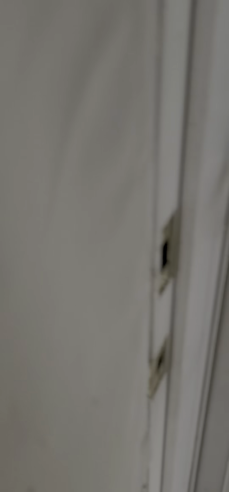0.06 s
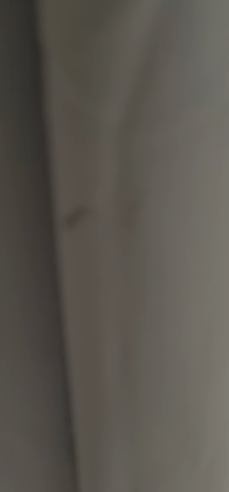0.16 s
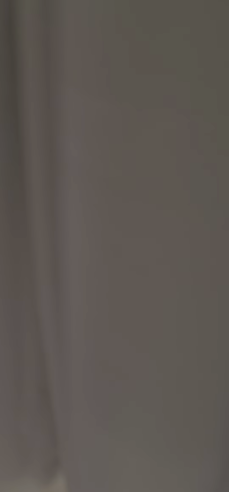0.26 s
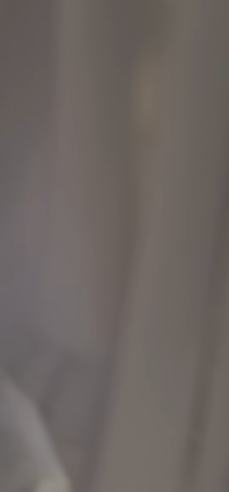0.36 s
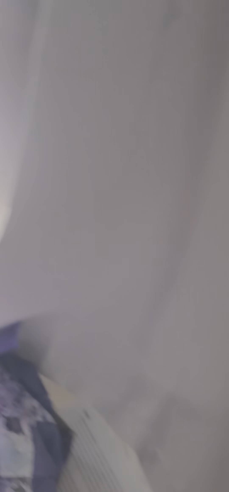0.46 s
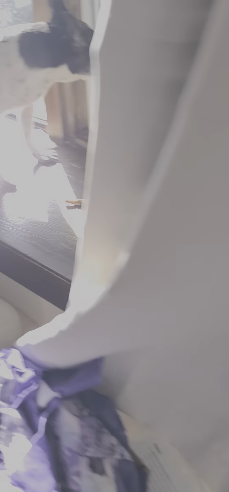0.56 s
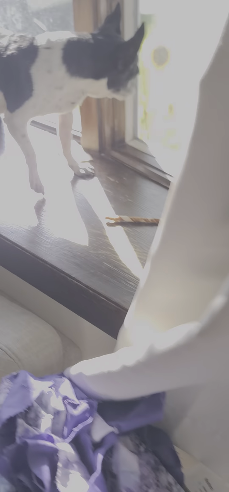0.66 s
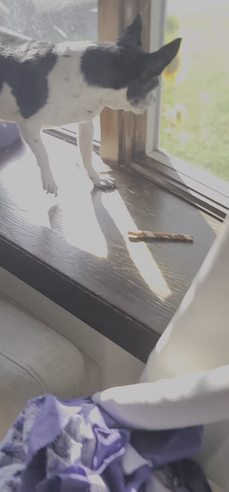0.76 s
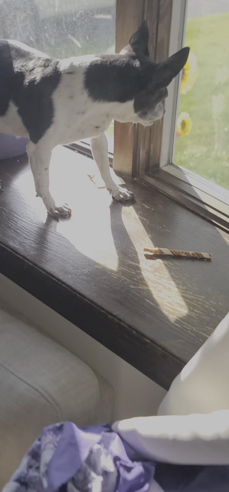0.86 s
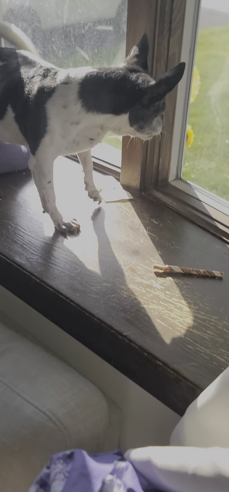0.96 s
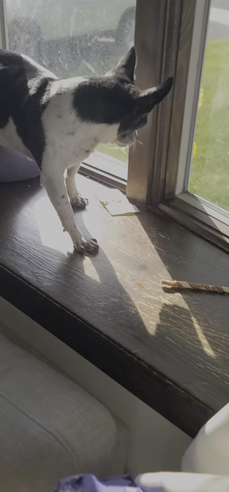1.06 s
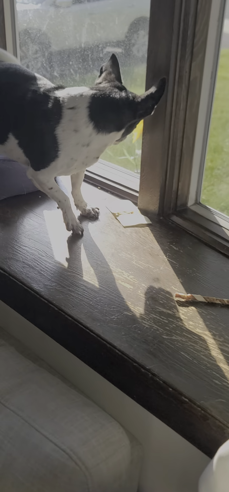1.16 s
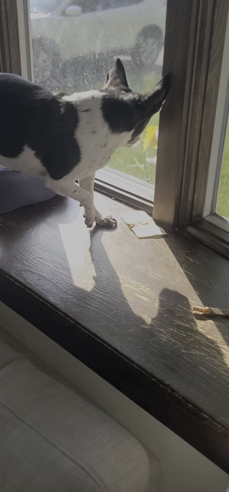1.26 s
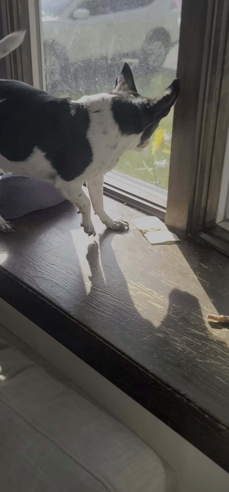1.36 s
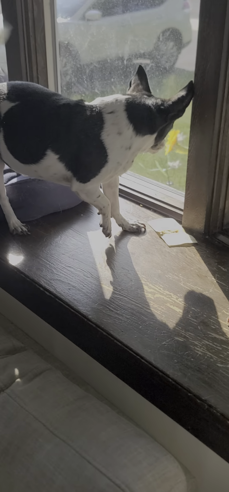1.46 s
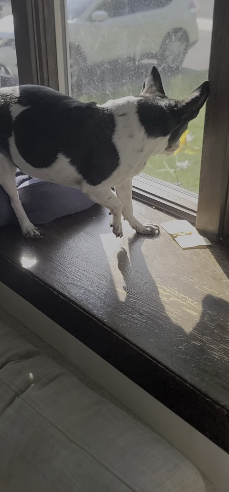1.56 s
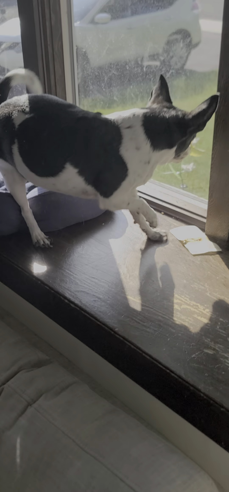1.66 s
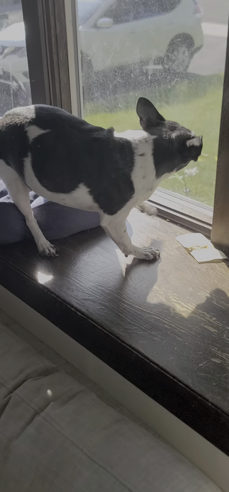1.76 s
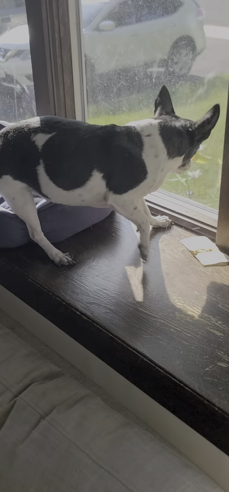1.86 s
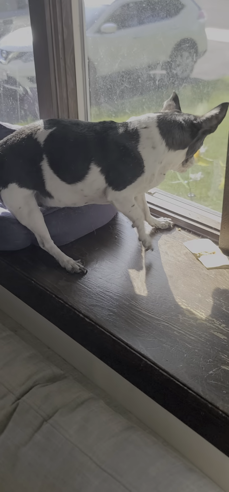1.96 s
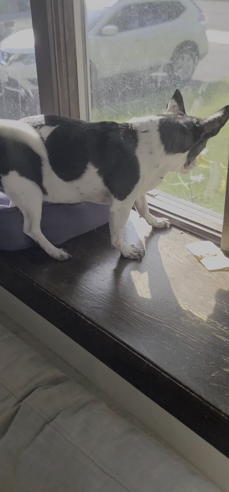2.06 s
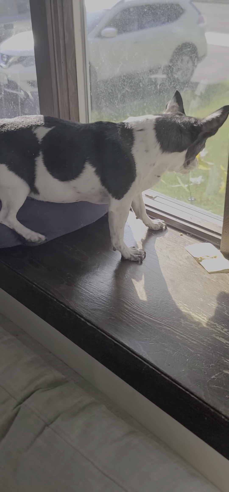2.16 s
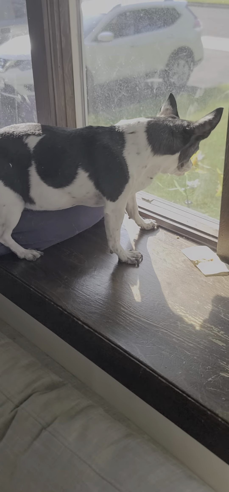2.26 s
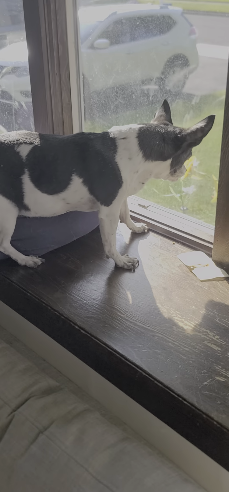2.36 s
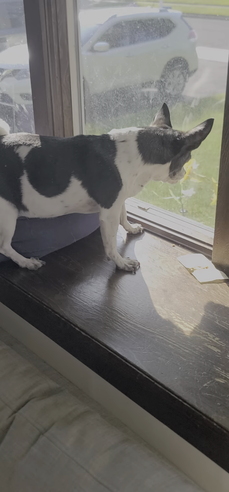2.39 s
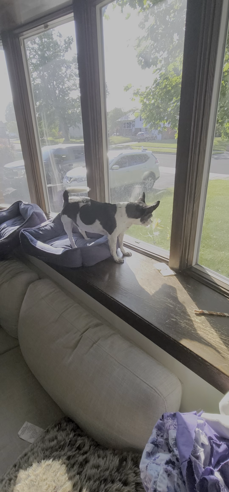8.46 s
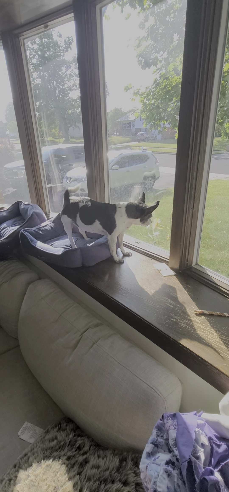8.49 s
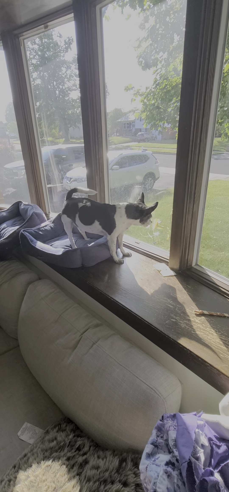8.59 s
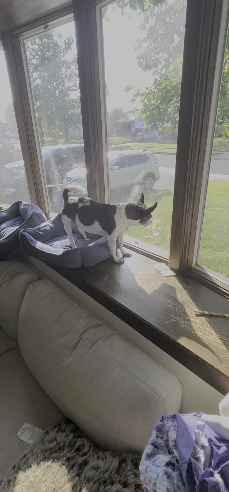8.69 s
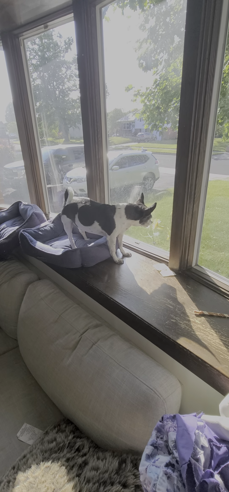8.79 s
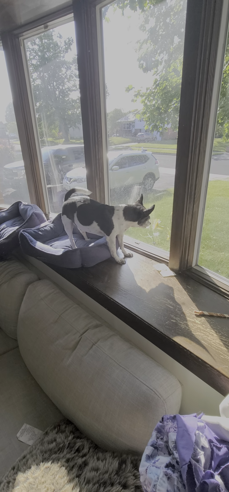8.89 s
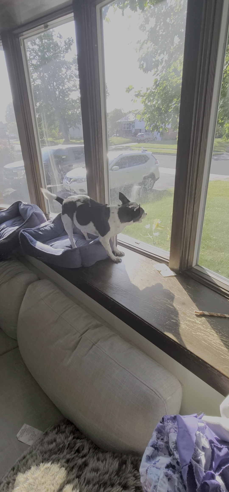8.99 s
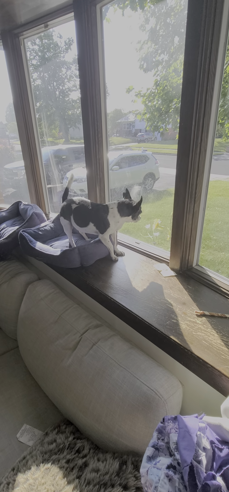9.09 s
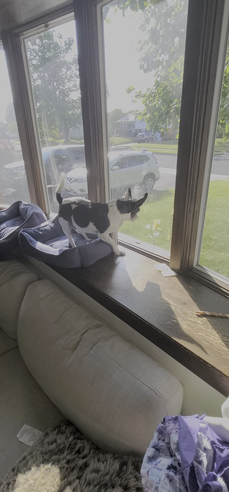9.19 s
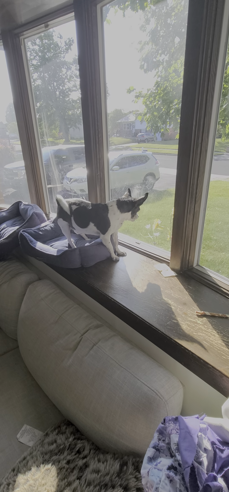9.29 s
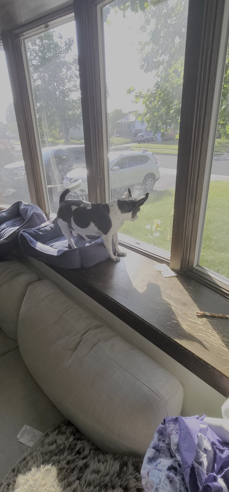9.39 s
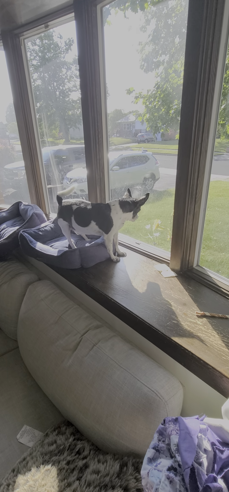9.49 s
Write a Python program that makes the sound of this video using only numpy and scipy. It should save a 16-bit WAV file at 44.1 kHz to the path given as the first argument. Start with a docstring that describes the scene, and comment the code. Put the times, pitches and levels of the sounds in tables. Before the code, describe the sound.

A small dog on a living-room window sill throbs out low growls, each snapping into one sharp, high yap, eight times over.

```python
"""A small dog growls and barks eight times at something outside, on a window sill in a living room.
Each growl throbs about 24 times a second and leads into one arched yap with low grunts behind it;
these voices are vocal-fold pulses and puffs of air, filtered by throat and mouth resonances.
Wet mouth clicks and soft sniffs are shaped noise, a smooth moan is the growl's voice without throbs.
Dull low bumps are sine swells; filtered noise makes the quiet room, and sparse echoes answer the dog."""
import sys
import numpy as np
from scipy import signal
from scipy.fft import rfft, irfft, next_fast_len
from scipy.io import wavfile
from scipy.ndimage import uniform_filter1d, map_coordinates

SR = 44100
rng = np.random.default_rng(int(sys.argv[2]) if len(sys.argv) > 2 else 0)


def persist_wave(psi):
    """Save psi, clipped to +-1, as 16-bit WAV."""
    counts = np.round(np.clip(psi, -1, 1) * 32767).astype(np.int16)
    wavfile.write(sys.argv[1], SR, np.atleast_2d(counts).T)


N = 420713

# Yaps: (onset [s], length at full voice [s], effort [dB], top pitch [Hz], place of the top [share of length],
#        then relative to effort: chest under 600 Hz [dB], open-mouth resonance [dB],
#        upper throat resonance [dB], hiss [dB])
YAPS = [(0.459, 0.11, -7, 385.4, 0.7245, 3.5, -9.5, -18, -22),
        (1.708, 0.078, -7, 383, 0.58, 4.5, -6.5, -21.5, -20),
        (2.595, 0.089, -9, 387.2, 0.59, 2.5, -2.5, -18, -20),
        (3.702, 0.091, -10.5, 387.9, 0.58, 1.5, -2, -18, -19),
        (5.137, 0.12, -10, 396.5, 0.8, 1.5, -4, -21, -22.5),
        (6.363, 0.103, -10.5, 380.1, 0.45, 2.5, -2.5, -17, -21),
        (7.685, 0.098, -9.5, 394.3, 0.6, -0.5, -2, -18, -23.5),
        (8.947, 0.086, -10.5, 387.3, 0.6, 2, -1.5, -15.5, -20.5)]
# Growls: (first throb [s], length [s], first throb period [s], start effort [dB], end effort [dB],
#          start pitch [Hz], end pitch [Hz], jaw gap as gain of the throat above 600 Hz [dB])
GROWLS = [(0.25, 0.18, 0.0355, -35, -24.5, 190, 188.3, -14.5),
          (1.408, 0.27, 0.038, -31, -32, 195.9, 207, -10.5),
          (2.471, 0.099, 0.034, -31.5, -32.5, 221, 250.2, -0.5),
          (3.325, 0.32, 0.0391, -38.5, -23, 189.1, 236.5, 3),
          (4.381, 0.715, 0.0393, -27, -26, 238.3, 241.1, 3),
          (5.9, 0.415, 0.0405, -37, -26.5, 188.5, 231.5, -1.5),
          (7.162, 0.53, 0.0402, -37, -25.5, 176, 238.4, 2.5),
          (8.461, 0.5, 0.0404, -39, -24.5, 171, 239.7, 3.5)]
# Grunts as the throat closes after a bark: (time [s], relative level [dB], nominal pitch [Hz])
GRUNTS = [(0.602, -21, 129), (0.639, -23, 124.5), (0.743, -25, 197.2), (1.911, -26.5, 98.6),
          (1.966, -23.5, 140.8), (2.004, -32.5, 140), (2.738, -27.5, 208.3), (2.879, -27, 145.9),
          (3.955, -27, 166.4), (4.019, -27, 141.8), (5.395, -25.5, 149.2), (6.518, -27, 136.7),
          (6.691, -31, 136), (7.955, -25.5, 166.7), (7.999, -30, 163), (9.188, -23, 154.1)]
# Clicks of lips and tongue: (time [s], relative level [dB], bite under 4.7 kHz [dB], sparkle over 8 kHz [dB])
MOUTH_CLICKS = [(0.0313, -29, -1, -17.5), (0.322, -26, -5, -14.5), (1.028, -17, -6, -3),
                (1.1428, -33.5, 0, -21), (1.4188, -39, -11, -7), (1.8281, -27, -5.5, -18),
                (1.885, -34, -3.5, -7.5), (1.9998, -33, 1, -12), (2.2252, -32, -0.5, -12.5),
                (3.9694, -40.5, -4, -5), (4.261, -45, -5, -13), (4.4724, -33, 0, -6),
                (4.904, -31, 1.5, -16.5), (5.378, -34, -3.5, -8), (5.794, -32, -5.5, -11.5),
                (6.0684, -40, 0, -13), (6.6426, -46.5, 2, -10), (6.9944, -39, -6, -9.5),
                (7.9762, -45, -2.5, -11.5), (8.4998, -50, 5.5, -10.5), (9.2877, -41.5, 1, -13)]
# Dull bumps: (time of the height [s], relative level [dB])
BUMPS = [(4.805, -35), (5.095, -36), (5.134, -35), (8.275, -36.5), (8.344, -47.5)]
# Soft sniffs: (time [s], level [dB], length [s])
SNIFFS = [(0.018, -67.5, 0.13), (0.387, -46, 0.062), (0.88, -56.5, 0.18), (1.038, -51, 0.0683),
          (1.146, -46, 0.076), (1.33, -64, 0.145), (2.059, -53.5, 0.061), (2.263, -66.5, 0.05),
          (2.363, -55.5, 0.096), (4.094, -53.5, 0.0935), (4.739, -57, 0.085), (5.055, -45.5, 0.048)]
# One moan that sinks into the second growl: (time [s], effort [dB], pitch [Hz], roughness [0-1],
#          then relative to effort: open-mouth resonance [dB], rasp [dB])
MOAN = [(1.145, -35.5, 234, 0.3, -16, -12.5), (1.18, -31, 252.6, 0.5, -4, -31.5),
        (1.25, -30, 259.4, 0.2, -20, -31), (1.33, -31.5, 240.1, 0.2, -26, -33.5),
        (1.4, -36.5, 203, 0.6, -23, -32.5)]

# Throat resonances of the yap: (frequency [Hz], level [dB])
YAP_THROAT = [(60, -42.5), (180, -18), (280, -13.5), (380, -12), (480, -8.5), (620, 0.5), (760, -1.5),
              (900, -3), (1020, -12), (1170, -4), (1400, -16.5), (1600, -22)]
# Upper throat resonance of the yap: (frequency [Hz], level [dB])
YAP_UPPER = [(1200, -38), (1650, -8.5), (1950, 2), (2330, 0.5), (2700, -17.5), (3200, -17.5), (3800, -26.5),
             (5000, -53.5)]
# Breathy hiss of the yap: (frequency [Hz], level [dB])
YAP_HISS = [(2000, -40), (3200, -14.5), (3750, -22), (4300, -8), (4800, -18), (5500, -2.5), (6700, -1.5),
            (7900, -7), (9300, -9.5), (11000, -9.5), (14000, -11.5), (16000, -11)]
# Throat resonances of the growl: (frequency [Hz], level [dB])
GROWL_THROAT = [(60, -40.5), (150, -13.5), (225, -5.5), (330, -7), (450, -12.5), (560, -3.5), (700, -1),
                (830, -9), (1000, -19), (1200, -28.5), (1600, -40)]
# Raspy puffs of the growl: (frequency [Hz], level [dB])
GROWL_RASP = [(1000, -34.5), (1800, -1.5), (2800, 2.5), (4300, -18), (5600, -8.5), (7000, -11), (8700, -9),
              (11000, -9.5), (16000, -33.5)]
# Air between the teeth in a growl: (frequency [Hz], level [dB])
GROWL_AIR = [(4000, -28.5), (5800, -14), (7600, -12.5), (8500, 3), (9200, 2), (10000, -14), (16000, -22)]
# Wet crackle of the clicks: (frequency [Hz], level [dB])
CLICK_COLOUR = [(100, -6.5), (600, -9.5), (1500, -7), (2400, -2.5), (3300, 3.5), (4500, -17.5), (6300, -7),
                (9000, -15), (15000, -14.5)]
# Air through the nose: (frequency [Hz], level [dB])
SNIFF_COLOUR = [(300, -20), (1200, -8), (2000, -1.5), (3000, 5.5), (4500, -7.5), (6300, -4.5),
                (9000, -15.5), (15000, -17.5)]
# Room tone: (frequency [Hz], level [dB])
ROOM_TONE_COLOUR = [(25, -17), (60, 4.5), (130, -3), (300, -12), (650, -20.5), (1100, -28), (2100, -31),
                    (4000, -38.5), (7000, -47), (16000, -59.5)]
# Ring time of the room: (frequency [Hz], time to fall by 60 dB [s])
ROOM_T60 = [(120, 0.66), (400, 0.555), (760, 0.53), (1200, 0.47), (2200, 0.53), (3300, 0.67), (7000, 0.556),
            (15000, 0.4)]
# Strength of the room's ring: (frequency [Hz], level [dB])
ROOM_COLOUR = [(100, -6), (380, 3), (760, -5), (1200, 1.5), (2500, -8), (6500, -5), (14000, -7)]
# Lead of the left microphone in the direct sound: (frequency [Hz], phase [rad])
LEFT_LEAD = [(100, -0.75), (380, 1.19), (740, 0.5), (900, 2.5), (1080, 5), (1180, 5.5), (1500, 4),
             (2000, 7.5), (2700, 8), (7000, 15), (16000, 27)]
# Balance of the direct sound: (frequency [Hz], left minus right [dB])
LEFT_BALANCE = [(100, 2), (240, -3), (380, 5), (620, 0), (770, -8), (1000, 5.5), (1200, -3), (2000, 0.5),
                (3200, 6), (6000, 7), (9000, 3.5), (14000, 9)]

# Room tone's base level, and the upper edge of the final band
ROOM_TONE_DB, EDGE_HZ = -52, 16100

# Yap roughness (0-1): hoarse until the voice catches, clean, hoarse again as it breaks
CLEAN, HOARSE, CATCH_S, BREAK_S = 0.095, 0.62, 0.014, 0.029
# Yap effort: wells up out of the growl, jumps as the voice catches, sags while held, then drops
LEAD_IN_S, ATTACK_S, ATTACK_DB, JUMP_DB, JUMP_S = 0.05, 0.074, 38, 1.5, 0.0027
SAG_DB, RELEASE_S, RELEASE_DB_PER_S = 8, 0.046, 189.5
# Yap pitch arch: slack pitch; reach of the rise before the onset and width of the fall (shares of length)
SLACK_HZ, ARCH_RISE, ARCH_FALL = 195.9, 0.42, 0.3
# Jaws: opening times of mouth and upper resonance; loss of both and of the hiss while shut
OPEN_S, UPPER_OPEN_S, SHUT_MOUTH_DB, SHUT_UPPER_DB, SHUT_HISS_DB = 0.022, 0.075, -23, -24, -8.5
# Snarl: pitch at the onset, climb, width of each of its two filters
SNARL_HZ, SNARL_HZ_PER_S, SNARL_WIDTH_HZ = 2540, 5200, 360
# Snarl: level re effort, time of its peak, spread around the peak
SNARL_DB, SNARL_PEAK_S, SNARL_S = -25, 0.012, 0.052
# Thinning of the fundamental: depth, then place and width as shares of the yap's length
THIN_DB, THIN_AT, THIN_WIDTH = -10, 0.59, 0.17

# Throbs: width, lengthening of the period per throb, unevenness in time and strength
THROB_S, THROB_SLOWING_S, THROB_JITTER_S, THROB_SPREAD_DB = 0.0067, 0.00042, 0.001, 1.5
# Growl between throbs (re throb) at its start and end; a power under 1 makes the swell come early
TROUGH_START_DB, TROUGH_END_DB, SWELL_POWER = -14, -9, 0.7
# Lips close early in a growl: time, then mouth resonance and rasp re effort, parted and closed
LIPS_CLOSE_S = 0.092
PARTED_MOUTH_DB, CLOSED_MOUTH_DB, PARTED_RASP_DB, CLOSED_RASP_DB = -8.5, -24, -23.5, -40
# Roughness between throbs (0-1), with lips closed and parted
GROWL_ROUGH, PARTED_ROUGH = 0.52, 0.8
# A growl eases in: how much weaker it starts, and for how long
EASE_DB, EASE_S = -2, 0.019
MOAN_JAW_DB, GRUNT_S, CLICK_DECAY_S = -6.5, 0.039, 0.005


def amp(db):
    """Turns decibels into a gain."""
    return 10 ** (np.asarray(db) / 20)


def ramp(x):
    """Rises from 0 to 1 and stays there."""
    return np.clip(x, 0, 1)


def evened(x):
    """Scales a sound to an overall power of 1."""
    return x / np.sqrt(np.mean(x ** 2) + 1e-20)


def steadied(x, size=530):
    """Holds the running power of x at 1."""
    power = uniform_filter1d(uniform_filter1d(x ** 2, size), size)
    return x / np.sqrt(abs(power) + 1e-20)


def faded(x, count=260):
    """Softens both ends of a call."""
    i = np.arange(len(x))
    return x * np.minimum(np.minimum(i, i[::-1]) / count, 1)


def wobble(count, hz):
    """Random motion of unit size, low-passed at hz."""
    return evened(band(rng.standard_normal(count), hz, "low", order=2))


def read(points, hz):
    """A spectrum joined by straight lines on a log-frequency axis."""
    f, value = np.transpose(points)
    return np.interp(np.log(hz + 1), np.log(f + 1), value)


def band(x, hz, kind, order=4):
    """Butterworth filter that keeps one part of the spectrum."""
    return signal.sosfilt(signal.butter(order, hz, kind, fs=SR, output="sos"), x)


def colour(x, points, size=4096):
    """Causal minimum-phase filter with the given spectrum."""
    hz = abs(np.fft.fftfreq(size, 1 / SR))
    log_gain = np.log(amp(read(points, hz)))
    taps = np.fft.ifft(np.exp(np.conj(signal.hilbert(log_gain)))).real
    return signal.fftconvolve(x, taps[:size // 2])[:len(x)]


def rippled(spectrum, ripple_db):
    """Teeth and lips lie differently each time and lay new narrow resonances over a spectrum."""
    hz = np.geomspace(100, 16000, 120)
    ripple = ripple_db * np.clip(rng.standard_normal(len(hz)), -2, 1)
    return np.transpose([hz, read(spectrum, hz) + ripple])


def add(mix, s, sound):
    """Lays a sound into the mix at s seconds."""
    part = mix[max(round(s * SR), 0):][:len(sound)]
    part += sound[:len(part)]


def played(source, table):
    """All events of one table on one track."""
    track = np.zeros(N)
    for row in table:
        add(track, *source(*row))
    return track


def controls(rows):
    """Times and the smoothly joined columns of one call."""
    s, *columns = np.transpose(rows)
    t = np.arange(s[0], s[-1], 1 / SR)
    return t, [uniform_filter1d(np.interp(t, s, c), size=200) for c in columns]


def room_tone(swell_db=6.0, side_db=-14, hiss_db=-7):
    """Low hum of the house, slowly swelling and nearly alike in both channels, under a faint wide hiss."""
    common, apart = (evened(colour(rng.standard_normal(N), ROOM_TONE_COLOUR)) for _ in range(2))
    hum = band(common, 200, "low", order=2) * amp(swell_db * wobble(N, 1.6))
    mid = hum + band(common, 200, "high", order=2)
    side = amp(side_db) * apart + amp(hiss_db) * band(apart, 600, "high", order=2)
    return amp(ROOM_TONE_DB) * np.array([mid + side, mid - side])


def room(x, early=1.3, early_s=0.016):
    """Sparse echoes: strong early ones from the window bay, then a tail that dies by band."""
    # one echo of random sign in every slot of 20 samples, drawn apart for each channel
    slots = np.arange(130, SR - 20, 20)
    at = slots + rng.integers(0, 20, (2, len(slots)))
    taps = np.zeros((2, SR))
    np.put_along_axis(taps, at, rng.choice([-1., 1.], at.shape), 1)
    hz, t, z = signal.stft(taps, SR, nperseg=256)
    decay = amp(-60 * t / read(ROOM_T60, hz)[:, None]) * (1 + early * np.exp(-t / early_s))
    # equal echo strength in every band before the room's colour
    strength = np.sqrt(np.mean(decay ** 2, axis=1, keepdims=True) * len(slots))
    decay *= amp(read(ROOM_COLOUR, hz))[:, None] / strength
    tail = signal.istft(z * decay, SR, nperseg=256)[1]
    return signal.fftconvolve(x[None], tail, axes=1)[:, :N]


def close_pair(x, hz=420):
    """Long waves reach both microphones alike."""
    mid, side = (x[0] + x[1]) / 2, band((x[0] - x[1]) / 2, hz, "high", order=2)
    return np.array([mid + side, mid - side])


def microphones(x):
    """The direct sound reaches the two microphones with different phase and strength."""
    size = next_fast_len(N + 4096)
    hz = np.fft.rfftfreq(size, 1 / SR)
    tilt = amp(read(LEFT_BALANCE, hz))
    lag = np.exp(-1j * read(LEFT_LEAD, hz))
    # the power of both channels together stays the same at every frequency
    ports = np.array([tilt, lag]) * np.sqrt(2 / (1 + tilt ** 2))
    return irfft(rfft(x, size) * ports, size)[:, :N]


def bump(s, db, hz=62, width=0.038):
    """A soft, deep boom: a sine that swells and fades."""
    t = np.arange(-SR // 6, SR // 6) / SR
    return s + t[0], amp(db + 6.5) * np.exp(-(t / width) ** 2) * np.sin(2 * np.pi * hz * (t + s))


def sniff(s, db, length):
    """A soft, uneven hiss of air through the dog's nose."""
    count = int(max(length, .02) * SR)
    air = colour(rng.standard_normal(count) * amp(1.3 * wobble(count, 150)), SNIFF_COLOUR)
    return s, amp(db) * evened(air * signal.windows.tukey(count, .6))


def mouth_click(s, db, bite_db, sparkle_db, gain_db=-1.5, linger_db=-24):
    """A short crackle of wet lips parting, with a faint trail."""
    t = np.arange(-SR // 50, SR // 10) / SR
    noise = rng.standard_normal(len(t)) * amp(1.2 * wobble(len(t), 650))
    crackle = colour(noise, rippled(CLICK_COLOUR, ripple_db=7.0))
    bite = amp(bite_db) * evened(band(crackle, 4700, "low"))
    middle = amp(-6) * evened(band(crackle, [4000, 8000], "band"))
    sparkle = amp(sparkle_db) * evened(band(crackle, 8000, "high"))
    fall = np.exp(-t / CLICK_DECAY_S) + amp(linger_db) * np.exp(-t / 0.068)
    shape = fall / (1 + np.exp(-(t - .0015) / .0017)) ** 2
    return s + t[0], amp(db + gain_db) * shape / shape.max() * (bite + middle + sparkle)


def folds(hz, rough, jitter, air):
    """Pulses of the vocal folds and the puffs of air that they let through; rough folds beat unevenly."""
    count = len(hz)
    turns = np.cumsum(hz * (1 + jitter * (rough + 0.048) * wobble(count, 170))) / SR
    pulses = evened(sum(np.cos(2 * np.pi * k * turns) for k in np.arange(1, 17)))
    pulses *= amp(6.1 * rough * wobble(count, 160))
    # each puff starts strong and thins until the next beat
    puffs = evened((0.11 + np.exp(-(turns % 1) / 0.39)) * rng.standard_normal(count))
    return (1 - rough) * pulses + air * rough * puffs, puffs


def mouth(drive, throat, open_db):
    """The throat's first resonance always sounds; the second comes up as the jaws open."""
    voiced = colour(drive, throat)
    first = band(voiced, 950, "low", order=8)
    second = band(voiced, [980, 1650], "band", order=5)
    return steadied(first) + amp(open_db - 1.5) * steadied(second)


def rasp(drive, spectrum, course, glide, ripple_db):
    """Air in narrow resonances that shift as the given course rises and falls."""
    ringing = colour(drive, rippled(spectrum, ripple_db))
    speed = 1 + glide * evened(course - course.mean())
    return evened(map_coordinates(ringing, [np.cumsum(speed)], order=3, mode="mirror"))


def grunt(s, db, hz, gain_db=-5):
    """A few slack beats of the folds, sinking in pitch."""
    u = np.linspace(0, 1, int(GRUNT_S * SR))
    drive, _ = folds(hz * (1.1 - 0.82 * u), 0.57, jitter=0.06, air=1.)
    throat = [(50, -11), (130, 0.5), (230, -1.5), (450, -13.5), (1400, -16.0), (3000, -50.5), (12000, -52)]
    voice = evened(colour(drive, throat))
    return s, amp(db + gain_db) * voice * np.sin(np.pi * u ** 0.28)


def low_voice(hz, rough, jaw_db, open_db, rasp_db, waver=.025):
    """The hoarse, wavering voice behind nearly shut jaws."""
    drive, puffs = folds(hz * (1 + waver * wobble(len(hz), 35)), ramp(rough), jitter=.14, air=2.49)
    throat = [(f, db + jaw_db * (f > 600)) for f, db in GROWL_THROAT]
    return mouth(drive, throat, open_db) + amp(rasp_db) * evened(colour(puffs, GROWL_RASP))


def moan(rows):
    """The growling voice held smooth, without throbs."""
    t, (effort_db, hz, rough, open_db, rasp_db) = controls(rows)
    return t[0], faded(amp(effort_db) * low_voice(hz, rough, MOAN_JAW_DB, open_db, rasp_db))


def throbs(t, period, count=24):
    """A slowing, slightly uneven train of throbs, and the pinch of the throat just before each."""
    late, strong = rng.standard_normal((count, 2)).T
    periods = period + THROB_SLOWING_S * np.arange(count)
    starts = np.cumsum(periods) - periods + THROB_JITTER_S * late
    since = t - starts[:, None]
    power = amp(THROB_SPREAD_DB * strong) ** 2 @ np.exp(-(since / THROB_S) ** 2)
    pinch = np.exp(-((since + .016) / .009) ** 2).sum(0)
    return power, pinch


def growl(s, length, period, start_db, end_db, start_hz, end_hz, jaw_db,
          pinch_db=-5, lift=0.052, air_db=-35.0):
    """A growl glides towards the bark; each throb pushes up its level and pitch and clears its tone."""
    t = np.arange(-.016, length, 1 / SR)
    swell = ramp(t / length) ** SWELL_POWER
    parted = np.exp(-np.maximum(t, 0) / LIPS_CLOSE_S)
    power, pinch = throbs(t, period)
    between = amp(TROUGH_START_DB + (TROUGH_END_DB - TROUGH_START_DB) * swell + pinch_db * pinch)
    effort = np.sqrt(between ** 2 + power)
    push = 1 - between / effort
    hz = (start_hz + (end_hz - start_hz) * swell) * (1 + lift * (push - push.mean()))
    rough = (GROWL_ROUGH + (PARTED_ROUGH - GROWL_ROUGH) * parted) * (1 - 0.32 * push)
    open_db = CLOSED_MOUTH_DB + (PARTED_MOUTH_DB - CLOSED_MOUTH_DB) * parted
    rasp_db = CLOSED_RASP_DB + (PARTED_RASP_DB - CLOSED_RASP_DB) * parted
    # a thin stream of air swells and whistles between the teeth, most in long growls
    whistle = rasp(rng.standard_normal(len(t)), GROWL_AIR, -t, glide=0.017, ripple_db=6.5)
    air = amp(air_db) * length * swell * whistle
    voice = effort * low_voice(hz, rough, jaw_db, open_db, rasp_db) + air
    level_db = start_db + (end_db - start_db) * swell + EASE_DB * np.exp(-np.maximum(t, 0) / EASE_S)
    return s + t[0], faded(amp(level_db) * voice)


def resonate(x, hz, width):
    """A resonance of gain 1 that follows the curve hz."""
    # turn the moving resonance down to zero frequency, smooth, and turn back
    turn, r = np.exp(2j * np.pi * np.cumsum(hz) / SR), np.exp(-np.pi * width / SR)
    return 2 * (turn * signal.lfilter([1 - r], [1, -r], x / turn)).real


def snarl(t, drive):
    """A bright resonance at the start of a yap that climbs as the lips draw back."""
    hz = SNARL_HZ + SNARL_HZ_PER_S * t
    ringing = resonate(resonate(drive, hz, SNARL_WIDTH_HZ), hz, SNARL_WIDTH_HZ)
    return amp(SNARL_DB) * np.exp(-((t - SNARL_PEAK_S) / SNARL_S) ** 2) * steadied(ringing)


def yap_effort(t, length, db):
    """The push of breath in dB: welling up, jumping, sagging and dropping."""
    attack_db = ATTACK_DB * (np.exp(np.minimum(t, 0) / ATTACK_S) - 1) - JUMP_DB * ramp(-t / JUMP_S)
    release_db = RELEASE_DB_PER_S * np.maximum(t - length, 0)
    return db + attack_db - SAG_DB * ramp(t / length) ** 4.2 - release_db


def yap_pitch(u, top_hz, top_at, waver):
    """Fold tension lifts the pitch from slack to its top and lets it fall, with a slight waver."""
    rise = np.maximum(top_at - u, 0) / (top_at + ARCH_RISE)
    fall = np.maximum(u - top_at, 0) / (1 - top_at + ARCH_FALL)
    arch = np.exp(-rise ** 2.6 - fall ** 2.2)
    return (SLACK_HZ + (top_hz - SLACK_HZ) * arch) * (1 + waver * wobble(len(u), 40))


def thinned(drive, u):
    """Thins out the fundamental around one point of the yap."""
    fundamental = signal.sosfiltfilt(signal.butter(4, 540, fs=SR, output="sos"), drive)
    thinning = amp(THIN_DB * np.exp(-((u - THIN_AT) / THIN_WIDTH) ** 2))
    return drive + fundamental * (thinning - 1)


def bark(s, length, db, top_hz, top_at, chest_db, mouth_db, upper_db, hiss_db, muffle=0.75, waver=0.01):
    """A yap starts hoarse, rings clean along its pitch arch and breaks up at the end."""
    t = np.arange(-LEAD_IN_S, length + RELEASE_S, 1 / SR)
    u = t / length
    hz = yap_pitch(u, top_hz, top_at, waver)
    hoarse = ramp(-t / CATCH_S) + ramp(1 + (t - length) / BREAK_S)
    rough = ramp(CLEAN + (HOARSE - CLEAN) * hoarse)
    shut, upper_shut = (ramp((wide - t) / (wide + LEAD_IN_S)) for wide in (OPEN_S, UPPER_OPEN_S))
    open_db = mouth_db + SHUT_MOUTH_DB * shut
    drive, puffs = folds(hz, rough, jitter=.12, air=1.84)
    drive = thinned(drive, u)
    # the upper resonance mixes voice and air; it opens late and its air sinks
    upper_air = rasp(puffs, YAP_UPPER, -t, glide=.04, ripple_db=7.0)
    upper = steadied(0.78 * evened(colour(drive, YAP_UPPER)) + upper_air)
    torn = (puffs + 0.34 * rng.standard_normal(len(t))) * amp(1.8 * wobble(len(t), 150))
    hiss = rasp(torn, YAP_HISS, hz, glide=.024, ripple_db=5.0)
    # nearly shut jaws muffle the top of the hiss
    hiss_top = amp(muffle * (open_db + 2)) * band(hiss, 8400, "high")
    hiss = evened(band(hiss, 8200, "low") + hiss_top)
    throat = [(f, level + chest_db * (f < 600)) for f, level in YAP_THROAT]
    voice = mouth(drive, throat, open_db) + snarl(t, drive + 0.4 * puffs)
    voice += amp(upper_db + SHUT_UPPER_DB * upper_shut) * upper
    voice += amp(hiss_db + SHUT_HISS_DB * upper_shut) * faded(hiss, count=1200)
    return s + t[0], faded(amp(yap_effort(t, length, db)) * voice)


def scene(click_room_db=-2.5):
    """The dog at the window, the room's answer (weaker for the small clicks), bumps and room tone."""
    voice = played(bark, YAPS) + played(growl, GROWLS) + played(moan, [[MOAN]])
    voice += played(grunt, GRUNTS) + played(sniff, SNIFFS)
    clicks = played(mouth_click, MOUTH_CLICKS)
    echoes = close_pair(room(voice + amp(click_room_db) * clicks))
    return microphones(voice + clicks) + echoes + played(bump, BUMPS) + room_tone()


def record(dry):
    """Rounds off the loudest peaks, then limits the band."""
    rounded = dry / (1 + dry ** 8) ** (1 / 8)
    low_pass = signal.firwin(511, EDGE_HZ, window=("kaiser", 9), fs=SR)
    return signal.oaconvolve(rounded, low_pass[None], "same")


dry = scene()
out = record(dry)
persist_wave(out)
```